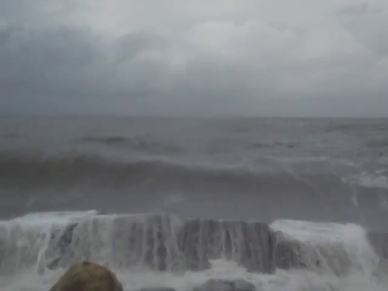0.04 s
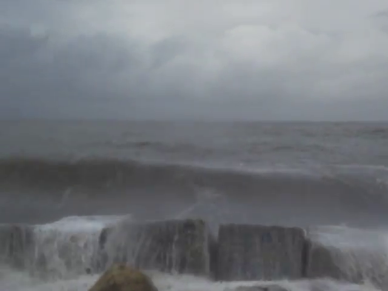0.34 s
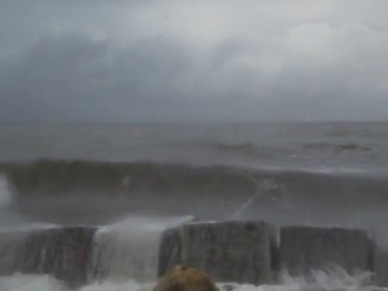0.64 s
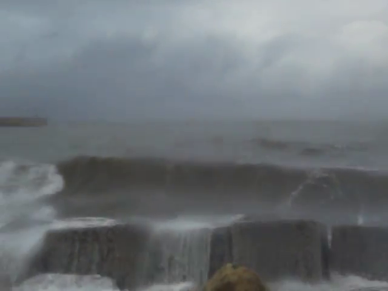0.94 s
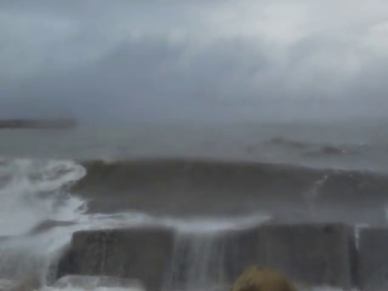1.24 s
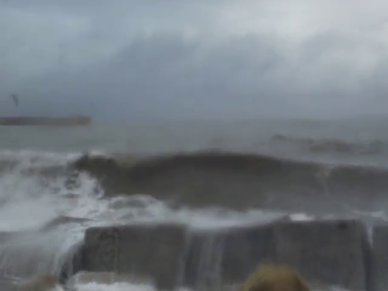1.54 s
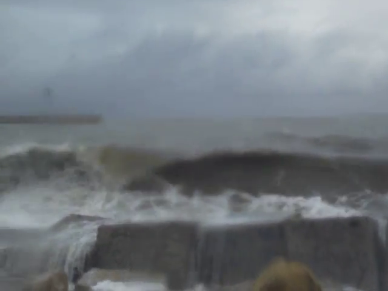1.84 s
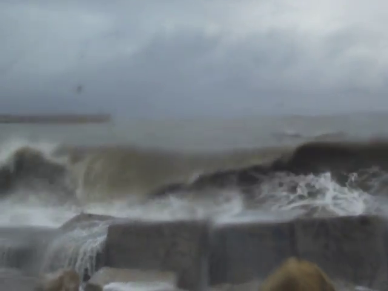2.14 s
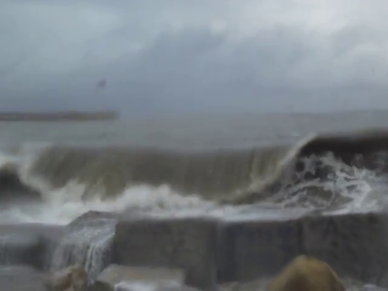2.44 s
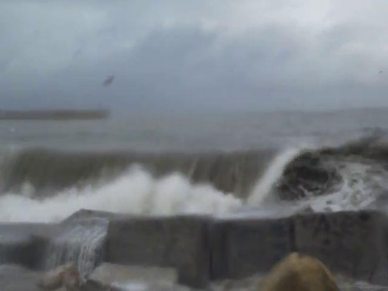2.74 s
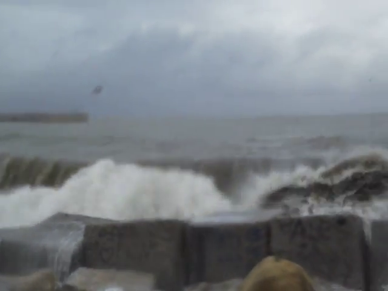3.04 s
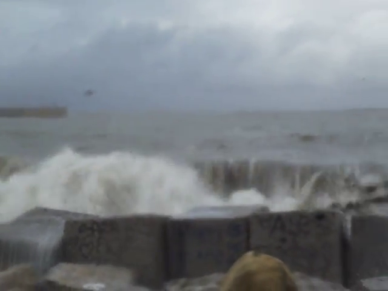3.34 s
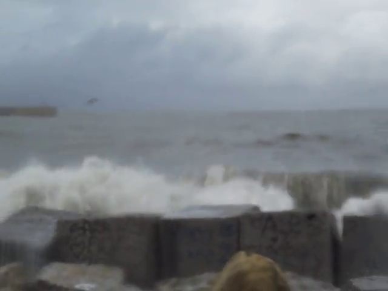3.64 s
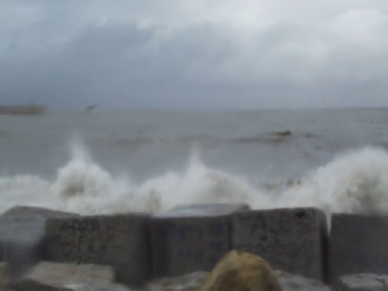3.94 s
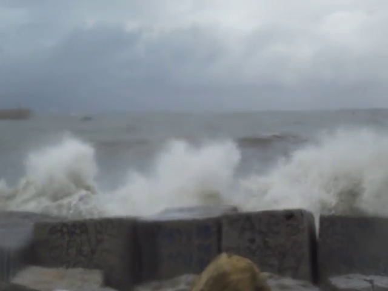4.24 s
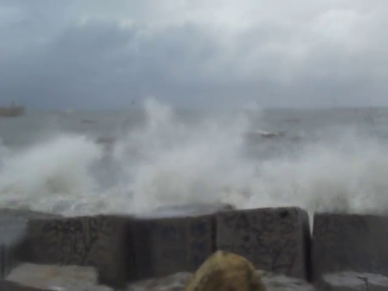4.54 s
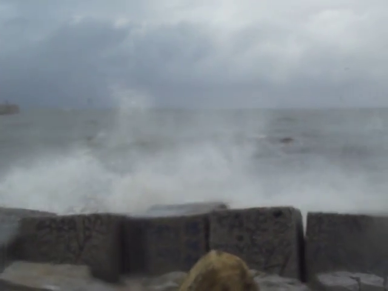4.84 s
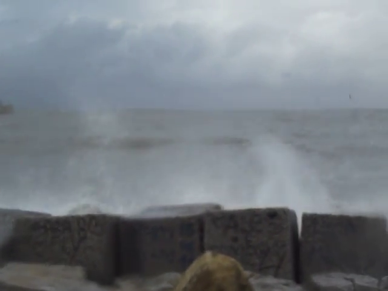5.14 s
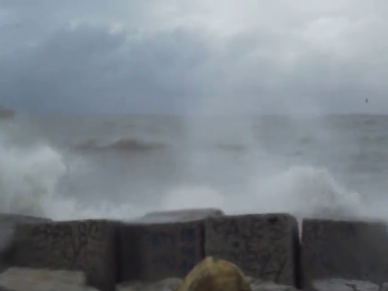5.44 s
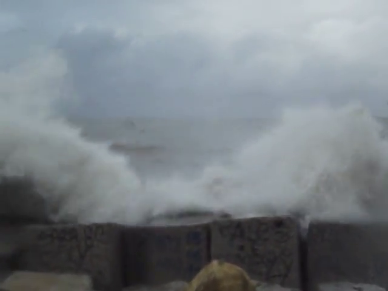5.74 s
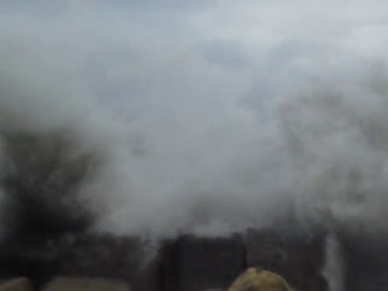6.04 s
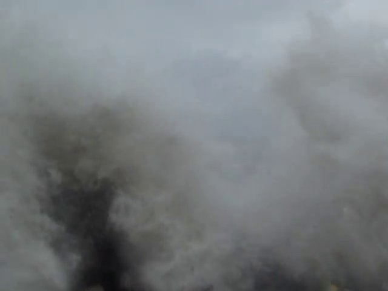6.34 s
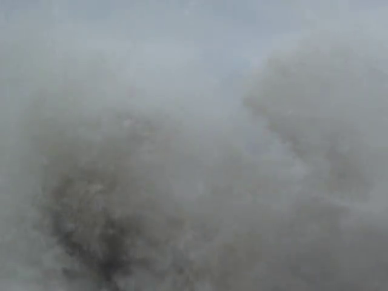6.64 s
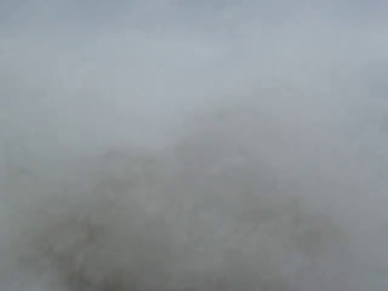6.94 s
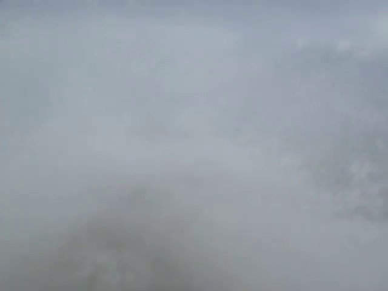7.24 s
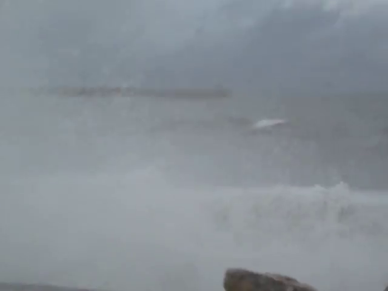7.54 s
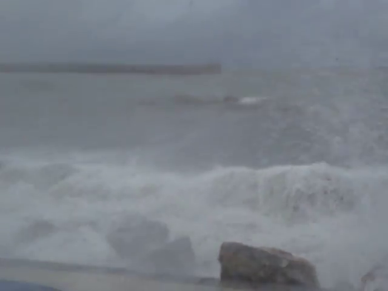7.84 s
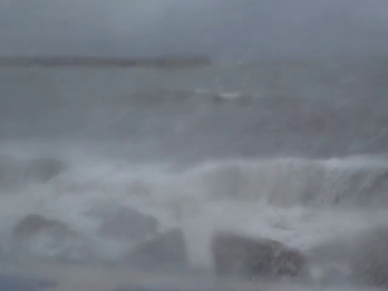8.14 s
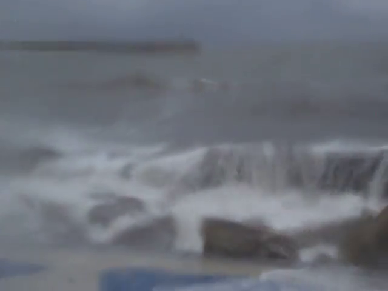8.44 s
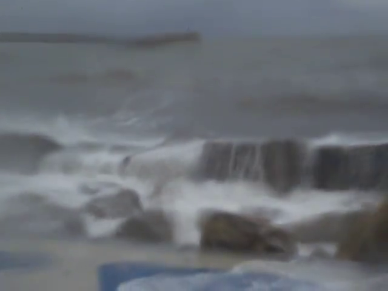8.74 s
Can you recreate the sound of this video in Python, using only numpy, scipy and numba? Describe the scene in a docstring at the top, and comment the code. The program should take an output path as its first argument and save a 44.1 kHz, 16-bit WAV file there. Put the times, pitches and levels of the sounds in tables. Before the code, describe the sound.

Storm surf crashes on a concrete seafront, partly buried under a gale buffeting the microphone with deep, distorted blasts.

```python
"""Storm waves break on the concrete blocks of a seafront, the biggest at about 6 s: foam hisses, water slaps.
A gale shakes the bare microphone of a small camera: deep rumble, tearing eddies, single hard buffets.
The microphone's cavity makes the surf ring near 3 kHz. Fast gain control ducks the surf under
gusts and buffets, and the peaks clip."""
import sys
import numpy as np
from scipy import signal
from scipy.fft import rfft, irfft, next_fast_len
from scipy.io import wavfile
from scipy.ndimage import map_coordinates
from numba import njit

SR = 44100
rng = np.random.default_rng(int(sys.argv[2]) if len(sys.argv) > 2 else 0)


def output_pcm(signal):
    """Save a mono or channel-first signal as 16-bit PCM at the path in sys.argv[1].

    Samples are clipped to [-1, 1] before scaling.
    """
    pcm = np.clip(np.atleast_2d(signal).T, -1, 1) * 32767
    wavfile.write(sys.argv[1], SR, np.round(pcm).astype(np.int16))


N = 387638
TIME_S = np.arange(N) / SR

# Spectrum of a vortex hitting the microphone. Each row: frequency in Hz, level in dB.
BUFFET_SPECTRUM = [(60, -8.5), (200, 7), (550, -3.5), (900, -9.5), (1500, -15.5), (2500, -19.5),
                   (5000, -50.5)]


def undb(db):
    """Decibels to gain."""
    return 10 ** (np.asarray(db) / 20)


def unit(x):
    """Scale to rms 1."""
    return x / np.sqrt(np.mean(x ** 2))


def colour(x, spectrum, tilt_db_per_octave=0):
    """Filter by a tilted spectrum; rms 1."""
    hz, db = np.transpose(spectrum)
    size = next_fast_len(len(x))
    octave = np.log2(np.maximum(np.arange(size // 2 + 1) * SR / size, 1))
    gain = undb(np.interp(octave, np.log2(hz), db) + tilt_db_per_octave * octave)
    return unit(irfft(rfft(x, size) * gain, size)[:len(x)])


def walk(rate_hz):
    """Smooth random curve, a new value every 1 / rate_hz s; rms 1."""
    steps = rng.standard_normal(N // 20)
    return unit(map_coordinates(steps, [TIME_S * rate_hz], order=2, mode="wrap"))


def noise():
    """White noise."""
    return rng.standard_normal(N)


def surf(surge_db=-1.0, churn_db=2.05, splash_db=-10, splashes_per_s=700, splash_spread_db=3):
    """Countless bursting bubbles hiss in surges; lumps of water slap on the blocks."""
    # Spectrum of the water. Each row: frequency in Hz, level in dB.
    surf_spectrum = [(100, 5), (350, -4.5), (700, -1.5), (1050, -6), (1300, -4), (1600, -5), (2200, -5),
                     (3000, -6), (3700, -12.5), (4500, -21), (5200, -33), (6000, -7)]
    foam = noise() * undb(churn_db * walk(130))
    splashes = (rng.random(N) < splashes_per_s / SR) * noise() * undb(splash_spread_db * noise())
    water = colour(foam + undb(splash_db) * unit(splashes), surf_spectrum)
    return unit(port_ring(water)) * undb(surge_db * walk(22))


def port_ring(x):
    """The air cavity in front of the microphone adds a narrow ring to the hiss."""
    # Cavity resonance: centre in Hz, width in Hz, gain of the ring in dB.
    resonance = (2930, 385, 11.7)
    centre_hz, width_hz, ring_db = resonance
    ring = signal.lfilter(*signal.iirpeak(centre_hz, centre_hz / width_hz, fs=SR), x)
    return x + undb(ring_db) * ring


def breakers(gain_db=2, wash_db=-28.5, rise_s=0.19, drain_db_per_s=15, roar_hz=1880):
    """Waves swell, pour and drain over a steady wash; plunging water roars, run-off mostly hisses."""
    # Each row: start in seconds, length in seconds, relative level in dB, boost below roar_hz in dB.
    waves = [(-0.4, 0.38, -24, 1.5), (1.81, 0.33, -26, -2.5), (2.172, 0.27, -20.5, 0),
             (3.3, 0.58, -24, 1.5), (4.603, 0.27, -29, 2), (5.41, 1.14, -20, -1.5),
             (6.093, 1.26, -14.5, -0.5), (7.604, 0.17, -17, -1), (8.2, 0.43, -25.5, -5.5)]
    power, roar_db = undb(wash_db) ** 2, np.zeros(N)
    for start_s, length_s, level_db, boost_db in waves:
        swell = np.clip((TIME_S - start_s) / rise_s, 0, 1)
        drain_db = drain_db_per_s * np.maximum(TIME_S - start_s - length_s, 0)
        power = power + (swell * undb(level_db - drain_db)) ** 2
        roar_db += swell * (boost_db - roar_db)  # the newest wave sets the roar
    water = surf() * np.sqrt(power) * undb(gain_db)
    roar = signal.sosfiltfilt(signal.butter(2, roar_hz, fs=SR, output="sos"), water)
    return water + (undb(roar_db) - 1) * roar


def wind(eddy_lift_db, rumble_db=-11, eddy_db=-21.5, blast_db=2):
    """Large eddies push the diaphragm slowly to and fro; the whole flow comes in quick blasts."""
    # Spectrum of the large eddies. Each row: frequency in Hz, level in dB.
    rumble_spectrum = [(6, -0.5), (16, -6), (32, -0.5), (55, 0), (80, -4), (125, -9), (200, -18),
                       (400, -40.5), (1000, -59.5)]
    shove = colour(noise(), rumble_spectrum)
    blasts = undb(blast_db * np.clip(walk(24), -2, 2))
    return blasts * (shove * undb(rumble_db) + eddies(shove) * undb(eddy_db + eddy_lift_db))


def eddies(shove, tear_db=4.5, shove_db=3.5, snap_db=-7.5, snap_spread_db=0.5):
    """Small eddies tear off the camera's edge in bursts, most under a hard shove; the smallest snap."""
    # Spectrum of the small eddies. Each row: frequency in Hz, level in dB.
    eddy_spectrum = [(50, -10), (120, -0.5), (200, -1.5), (300, -7), (500, -16), (800, -23), (1400, -28.5),
                     (2500, -49.5), (5000, -67)]
    force = np.minimum(np.abs(shove), 2.5)
    bursts = undb(tear_db * np.clip(walk(170), -2, 2) + shove_db * force)
    snaps_per_s = 75 * force
    snaps = (rng.random(N) < snaps_per_s / SR) * np.sign(noise())
    snaps *= undb(snap_spread_db * np.clip(noise(), -2, 2))
    flutter = colour(noise() * bursts, eddy_spectrum)
    return flutter + undb(snap_db) * colour(snaps, BUFFET_SPECTRUM)


def gusts(attack_s=0.025, release_s=0.051):
    """Lift of the whole wind and of its eddies: each gust arrives abruptly, holds and lets go."""
    # Each row: start in seconds, length in seconds, lift of the wind in dB, further eddy lift in dB.
    gust_events = [(0.322, 0.2, 9.5, -1), (0.546, 0.25, 3.5, 2), (0.805, 0.31, 12.5, 1),
                   (1.268, 0.247, 11, 2.5), (1.626, 0.32, 3, -1), (2.44, 0.93, 3.5, 1.5),
                   (2.858, 0.21, 9.5, 3), (3.15, 0.16, 2.5, 5), (3.95, 0.62, 3, 1), (4.426, 0.22, 7.5, 4),
                   (4.705, 0.073, 3, 4), (5.06, 0.18, 1.5, 1.5), (6.657, 0.35, -1.5, 5),
                   (7.394, 0.38, -0.5, 4.5), (8.003, 0.2, 8.5, 3), (8.346, 0.084, 3.5, 2.5)]
    lift_db, eddy_lift_db = np.zeros(N), np.zeros(N)
    for start_s, length_s, gust_db, eddy_db in gust_events:
        attack = np.clip((TIME_S - start_s) / attack_s, 0, 1)
        release = np.exp(-np.maximum(TIME_S - start_s - length_s, 0) / release_s)
        share = attack * release  # each gust takes over from the one before
        lift_db += share * (gust_db - lift_db)
        eddy_lift_db += share * (eddy_db - eddy_lift_db)
    return lift_db, eddy_lift_db


def buffets(gain_db=1, crest_s=0.0024, rise_s=0.00084, fall_s=0.0032, neutral_bright_db=-15):
    """A vortex hits the port squarely: pressure builds and collapses in a thud, brighter when small."""
    # Each row: time in seconds, relative peak level in dB, brightness in dB.
    hits = [(0.365, -9, -21), (0.708, -6.5, -18.5), (0.839, -10, -18), (0.866, -6.5, -25),
            (1.074, -14.5, -19), (1.185, -5, -10.5), (1.315, -9, -25), (1.385, -16, -19),
            (1.431, -9.5, -12), (1.448, -20, -4), (1.47, -13, -17), (1.508, -13, -8), (1.985, -16, -15),
            (2.858, -9, -21), (2.906, -21, -5), (3.007, -5, -9.5), (3.087, -6, -20.5),
            (3.129, -10.5, -16.5), (3.637, 1.5, -15.5), (4.033, -6.5, -8), (4.156, -1.5, -20),
            (4.531, -2.5, -21.5), (4.564, -8.5, -15), (4.641, 1, -22.5), (4.691, -14.5, -2),
            (8.282, -4.5, -20.5), (8.45, -9.5, -15)]
    out = np.zeros(N + SR)
    lead = SR // 32
    t = np.arange(-lead, lead) / SR - crest_s
    envelope = np.exp(np.where(t < 0, t / rise_s, -t / fall_s))
    envelope_rms = np.sqrt(np.mean(envelope ** 2))
    for time_s, peak_db, bright_db in hits:
        tilt_db_per_octave = 0.27 * (bright_db - neutral_bright_db)
        puff = colour(rng.standard_normal(len(t)) * envelope, BUFFET_SPECTRUM, tilt_db_per_octave)
        start = int(time_s * SR) - lead
        out[start:start + len(t)] += puff * envelope_rms * undb(peak_db + gain_db)
    return out[:N]


@njit
def follow_peak(x, attack_s, release_s, level):
    """Peak follower, starting at the given level."""
    out = np.empty(len(x))
    for i in range(len(x)):
        rectified = abs(x[i])
        lag_s = attack_s if rectified > level else release_s
        level += (rectified - level) / (lag_s * SR)
        out[i] = level
    return out


def gain_control(x, knee_db=-11, target_db=-4.5, attack_s=0.00091, release_s=0.037):
    """A peak over the knee turns the whole sound down at once; it swells back more slowly."""
    target = float(undb(target_db))
    peak = follow_peak(x, attack_s, release_s, target)
    return x * target / np.maximum(peak, undb(knee_db))


def scene():
    """Surf behind the wind, at one microphone; a gust lifts rumble, eddies and buffets together."""
    lift_db, eddy_lift_db = gusts()
    gale = undb(lift_db) * (wind(eddy_lift_db) + buffets())
    return (breakers() + gale)[None]


def record(dry, full_scale=0.707, hiss_db=-91.5, top_hz=15900):
    """The camera rides its gain, clips at SR / 4 and hisses; overshoots between its samples crackle."""
    quarter_rate = signal.resample_poly(gain_control(dry[0]), 1, 4)
    clipped = np.clip(quarter_rate, -full_scale, full_scale)
    interpolator = signal.firwin(129, 0.245, window=("kaiser", 9))
    full_rate = signal.resample_poly(clipped, 4, 1, window=interpolator)[:N]
    crackling = np.clip(full_rate, -full_scale, full_scale)
    hiss = undb(hiss_db) * noise()
    lowpass = signal.ellip(8, 0.2, 70, top_hz, fs=SR, output="sos")
    return signal.sosfilt(lowpass, crackling + hiss)[None]


dry = scene()
out = record(dry)
output_pcm(out)
```